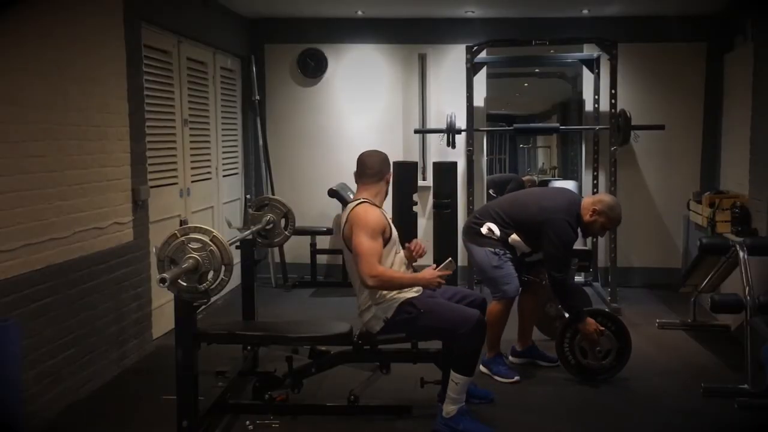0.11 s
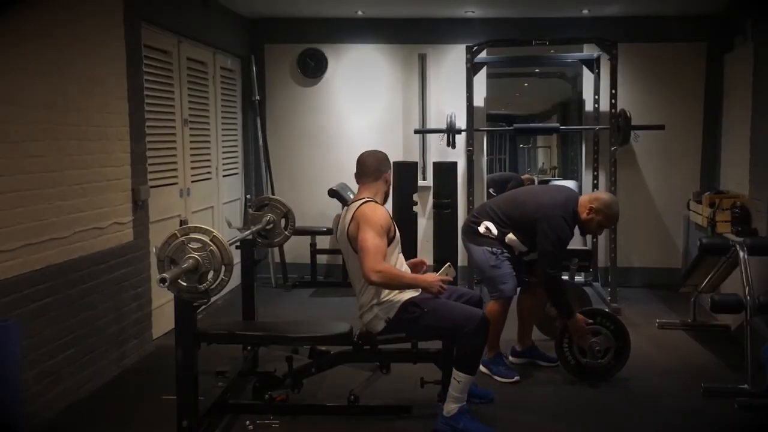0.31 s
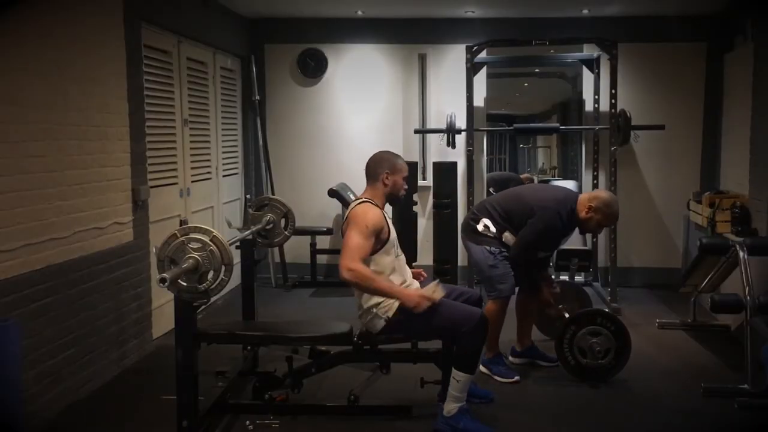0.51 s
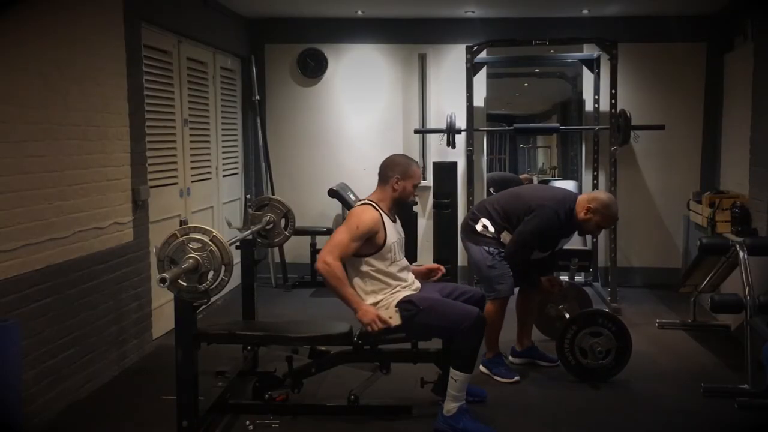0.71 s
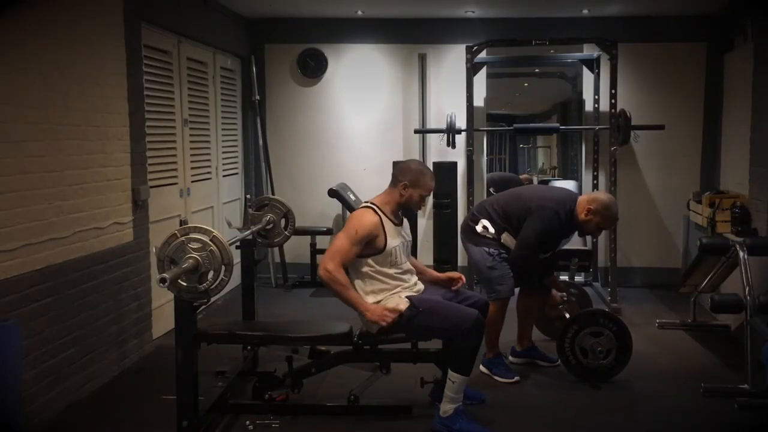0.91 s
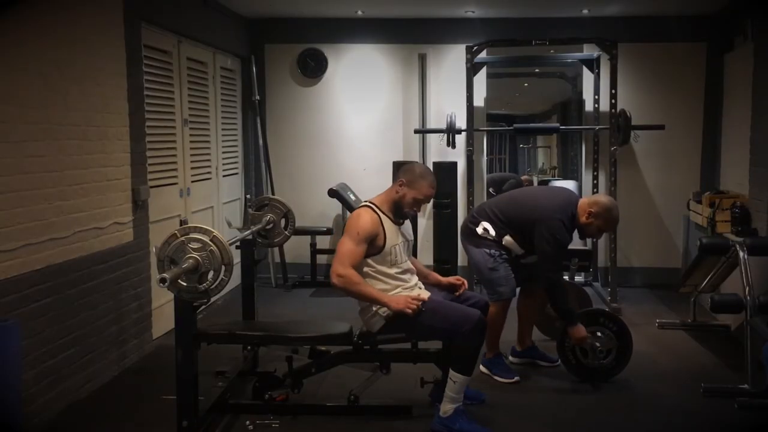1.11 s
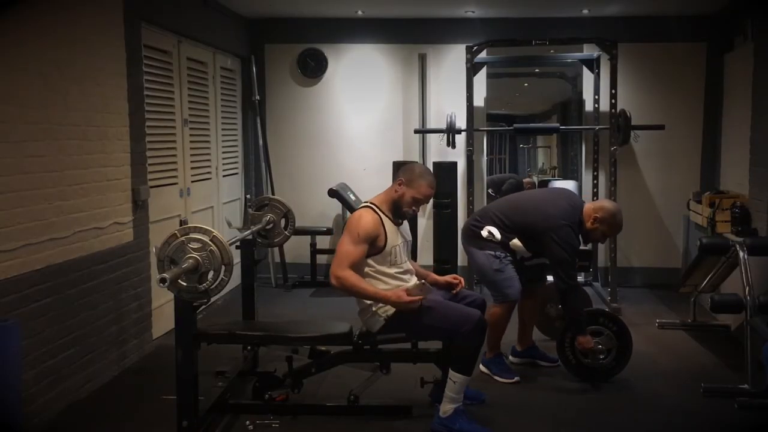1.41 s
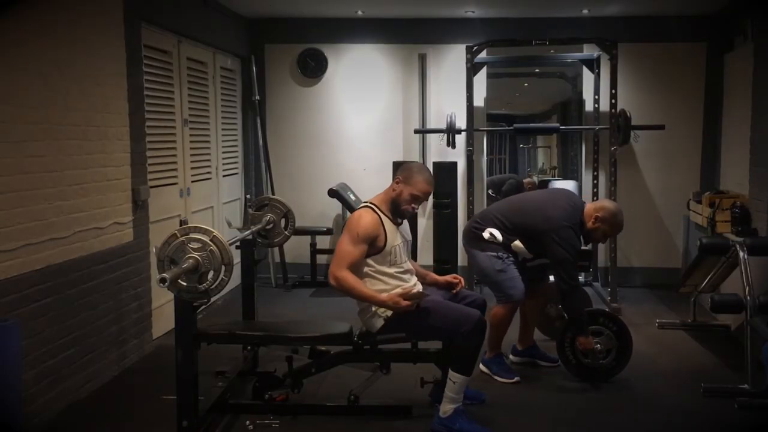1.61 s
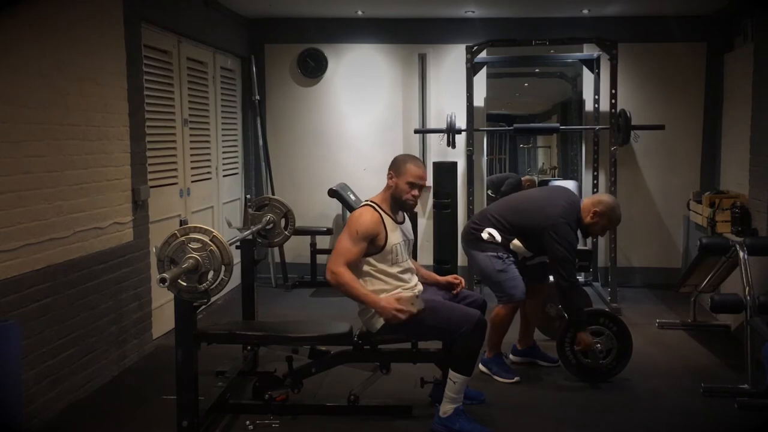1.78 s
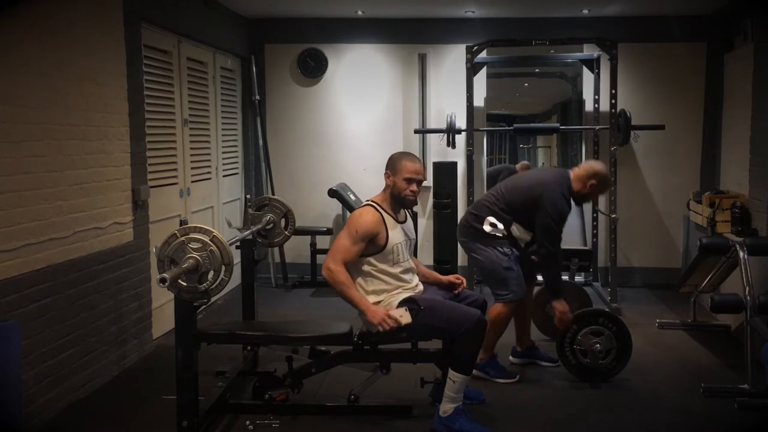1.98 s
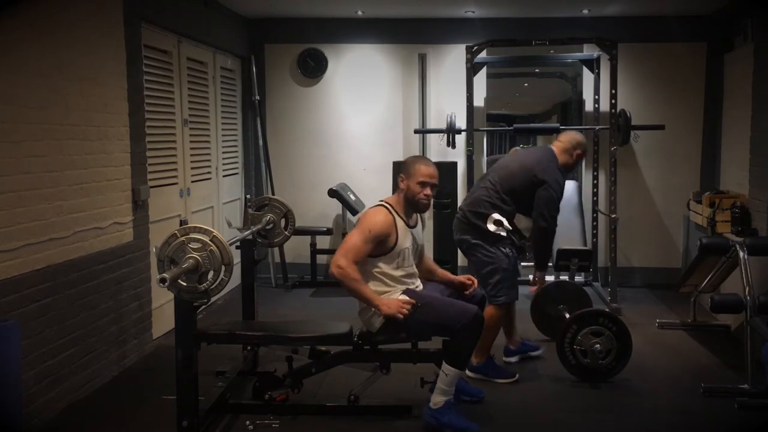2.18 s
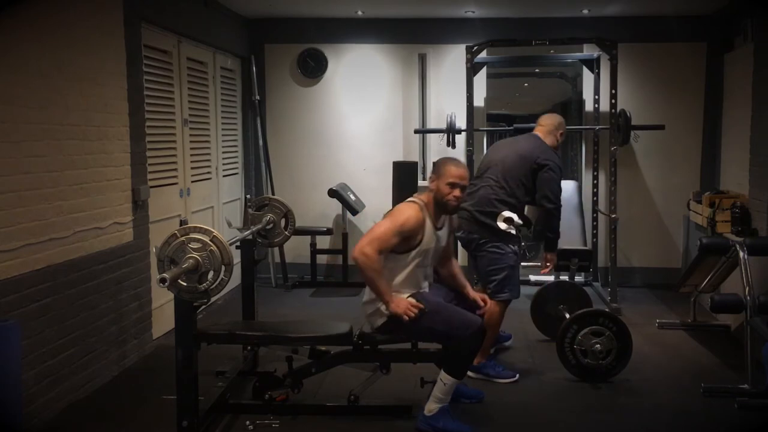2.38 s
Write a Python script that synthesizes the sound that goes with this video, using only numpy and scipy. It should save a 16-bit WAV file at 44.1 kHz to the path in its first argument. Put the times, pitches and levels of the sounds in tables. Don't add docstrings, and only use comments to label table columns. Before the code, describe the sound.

A weight plate clangs in a small, hard-walled gym. An earlier clank fades at the start; gritty iron scrapes at 0.15 s, then a loud, slightly overloaded clang with rapid rebounds hits at 0.23 s. Ringing is damped after 0.75 s. A shoe thuds near 0.9 s, small plates clink lightly from 1.34 to 1.8 s, and shoes scuff and step from 2.2 s, over faint cloth rustle, ventilation and hum.

```python
import sys
import numpy as np
from scipy import signal
from scipy.fft import rfft, irfft, next_fast_len
from scipy.io import wavfile
from scipy.ndimage import uniform_filter1d

SR = 44100
rng = np.random.default_rng(int(sys.argv[2]) if len(sys.argv) > 2 else 0)


def natural_amplitude(level_db):
    exponent = np.asarray(level_db, float) / 20
    return 10 ** exponent


def store_pcm(level_fs):
    pcm = np.round(np.clip(level_fs, -1, 1) * 32767).astype(np.int16)
    wavfile.write(sys.argv[1], SR, np.atleast_2d(pcm).T)


N = 110250
LEAD = 22050


def unit(x):
    return x / np.sqrt(np.mean(x ** 2) + 1e-20)


def along(points, hz):
    f, value = np.transpose(points)
    return np.interp(np.log(hz + 1), np.log(f + 1), value)


def noise(n, response):
    m = next_fast_len(n + 8192)
    spectrum = rfft(rng.standard_normal(m)) * response(np.fft.rfftfreq(m, 1 / SR))
    return unit(irfft(spectrum, m)[:n])


def peak(f, hz, width):
    return 1j * f * width / (hz * hz - f * f + 1j * f * width)


def soft_start(t, rise_s):
    return 1 - np.exp(-t / rise_s)


def add(out, s, x):
    part = out[round(s * SR) + LEAD:][:len(x)]
    part += x[:len(part)]


# frequency in Hz, t60 in seconds.
ROOM_DECAY = [(100, 1.8), (400, .9), (1500, 1.6), (4000, 1.27), (8000, 0.73), (15000, 0.45)]


def heard(x, wet_db):
    early_share, late_db, gap_s = 0.32, -4, 0.004
    hz, t, z = signal.stft(rng.standard_normal(SR * 3 // 2), SR, nperseg=256)
    fall_db = -60 * t / along(ROOM_DECAY, hz)[:, None]
    decay = natural_amplitude(fall_db / early_share) + natural_amplitude(fall_db + late_db)
    tail = signal.istft(z * decay, SR, nperseg=256)[1]
    tail = tail * np.clip(np.arange(len(tail)) / SR / gap_s, 0, 1)
    out = signal.fftconvolve(x, natural_amplitude(wet_db) * tail / np.linalg.norm(tail))
    out[:len(x)] += x
    return out


def blow(modes, ring_db, tilt_db, wet_db, crack_db, colour, bright_db=0, grip=(1, 1)):
    attack_s, crack_t60, wet_crack_db = 0.0004, 0.008, 8.5
    t = np.arange(SR) / SR
    ring = np.zeros(SR)
    for hz, db, t60 in modes:
        level_db = db + tilt_db * np.log2(hz / 1000) - 60 * t / t60
        ring += natural_amplitude(level_db) * np.sin(2 * np.pi * hz * t)
    grip_s, grip_t60 = grip
    damping = natural_amplitude(-60 * np.clip(t - grip_s, 0, 1) / grip_t60)
    out = natural_amplitude(ring_db) * heard(ring * soft_start(t, attack_s) * damping, wet_db)

    t = t[:SR // 20]
    snap = noise(len(t), lambda f: natural_amplitude(along(colour, f) + bright_db * np.log2(f / 4000 + 0.0087)))
    snap = snap * natural_amplitude(crack_db - 60 * t / crack_t60) * soft_start(t, attack_s)
    crack = heard(snap, wet_crack_db)
    out[:len(crack)] += crack
    return out


# frequency in Hz, level in dB.
CRACK_BIG = [(35, -67.5), (90, -35.5), (340, -13), (600, -13), (1200, -18), (4000, -22), (8150, -22.5),
             (16500, -68)]
# frequency in Hz, level in dB, t60 in seconds.
PLATE_MODES = [(351.6, -11.5, 0.1), (780.7, -13, 0.57), (827.7, -0.5, 0.82), (892, -7.5, 0.18),
               (1072, -14, 0.087), (1287, -13.5, 0.43), (1508.5, -5, .2), (1527.5, -14, 0.41),
               (1965, -17, .3), (2460, -31, 0.1), (2837, -9, 0.37), (3483, -17.5, 0.11), (4027, -13, 0.11),
               (5398, -20.5, 0.079)]
# start in seconds, ring level in dB, ring brightness in dB per octave,
# crack level in dB, crack brightness in dB per octave.
CLANGS = [
    (.2325, -10.5, -0.5, -16, -0.5),
    (.2545, -14.5, 2.5, -12, 0),
    (.277, -13.5, -2.5, -26, -1),
    (.312, -20, 8.5, -32, 4.5),
]


def big_plate(out):
    grip_s, grip_t60 = 0.28, 0.04
    for s, ring_db, tilt_db, crack_db, bright_db in CLANGS:
        grip = (grip_s - s, grip_t60)
        add(out, s, blow(PLATE_MODES, ring_db, tilt_db, -6, crack_db, CRACK_BIG, bright_db, grip))


# frequency in Hz, level in dB, t60 in seconds.
STRUCK_MODES = [(820, -6, 1.2), (829, 1.5, 4), (830.3, -2.5, 2.9), (1191, -9, 1.3), (1316, -13, 4.8),
                (1520, -12.5, 1.2), (1565, -14, 1.5), (1966, -24, 1.3), (2830, -19, 1.1),
                (2870, -14.5, 1.3), (2870, 0, 1.1)]
# start in seconds, ring level in dB, crack level in dB.
STRUCK_BLOW = [
    (.2325, -27.5, -63),
]


def struck_plate(out):
    grip_s, grip_t60 = 0.75, 0.21
    for s, ring_db, crack_db in STRUCK_BLOW:
        grip = (grip_s - s, grip_t60)
        add(out, s, blow(STRUCK_MODES, ring_db, 0, -19.5, crack_db, CRACK_BIG, 0, grip))


# frequency in Hz, level in dB.
CRACK_SMALL = [(400, -52), (900, 3), (2300, -13.5), (5000, -6.5), (8300, -10.5), (12000, -10), (15500, -10),
               (16500, -30)]
# frequency in Hz, level in dB, t60 in seconds.
EARLIER_MODES = [(780, -5.5, .04), (1323, -4, 0.036), (1520, -9, 0.2), (2027, -14, .1), (2424, -7.5, 0.06),
                 (3270, -4.5, .012), (3700, -4.5, .012), (4430, -9.5, 0.016), (6560, -0.5, 0.011),
                 (7880, -8.5, .012)]
SMALL_A = [(1200, -8.5, 0.034), (2324, 2, 0.024), (3730, -4, .05), (4410, -3.5, 0.076), (6430, 3, 0.023),
           (6940, 0, .025), (8200, -3.5, .05), (9110, -4, 0.039)]
SMALL_B = [(2225, -22, 0.049), (2887, -6, 0.03), (3658, -4, 0.057), (4230, -8, 0.053), (5840, -4, .05),
           (6450, -5, 0.078), (7760, -8, 0.045), (8350, 6, 0.059), (10000, -1.5, 0.031),
           (10070, -16, 0.035)]
SMALL_C = [(1290, -5.5, 0.26), (1320, -24, 0.11), (3606, -1.5, 0.044), (4460, -10, .03), (6370, 4.5, 0.023),
           (6660, 6.5, 0.042), (8300, 4.5, .05), (9730, -17, .03), (13600, -26, .03)]
SMALL_D = [(3220, -7.5, .05), (3700, -12, 0.022), (5880, 0, 0.011), (6760, -7, 0.013), (8355, -19, .03)]
# start in seconds, ring level in dB, crack level in dB,
# crack brightness in dB per octave.
EARLIER_BLOW = [
    (-0.27, -30, -17, -2),
]
CLINKS_A = [
    (1.339, -40.5, -30.5, 1.5),
    (1.357, -46.5, -39, -2.5),
]
CLINKS_B = [
    (1.4833, -39, -29, 1),
    (1.607, -52, -35, -2),
]
CLINKS_C = [
    (1.660, -47.5, -31.5, -4),
    (1.678, -51, -41.5, 1.5),
]
CLINKS_D = [
    (1.800, -43.5, -43, -2),
]


def small_plates(out):
    held_hz, held_t60 = 3000, 0.035
    pairs = ((EARLIER_MODES, EARLIER_BLOW), (SMALL_A, CLINKS_A), (SMALL_B, CLINKS_B),
             (SMALL_C, CLINKS_C), (SMALL_D, CLINKS_D))
    for modes, contacts in pairs:
        held = [(hz, db, min(t60, held_t60) if hz > held_hz else t60) for hz, db, t60 in modes]
        for s, ring_db, crack_db, bright_db in contacts:
            add(out, s, blow(held, ring_db, 0, 7.5, crack_db, CRACK_SMALL, bright_db))


def plates():
    out = np.zeros(N + LEAD)
    big_plate(out)
    struck_plate(out)
    small_plates(out)
    bass_cut = signal.butter(2, 170, 'high', fs=SR, output='sos')
    return signal.sosfilt(bass_cut, out)[LEAD:]


# time in seconds, level in dB.
SLIDE_LEVEL = [
    (.152, -83),
    (0.159, -48),
    (.18, -41.5),
    (.193, -37),
    (.205, -38.5),
    (.215, -32.5),
    (.232, -33.5),
    (.24, -91.5),
]
# frequency in Hz, width in Hz, level in dB.
GRIT_MODES = [(696, 89, 1.5), (1532, 170, 1), (1983, 9.2, 4), (3770, 300, -3.5), (4280, 400, -14),
              (6760, 400, -14), (7860, 300, -26.5), (9200, 210, -25.5)]
# frequency in Hz, level in dB.
GRIT_HISS = [(180, -55), (300, -10), (1510, 0), (2400, -29.5), (3460, -4), (7950, -19.5), (16000, -48)]


def slide():
    broad_db, grain_db = -10, 2

    def colour(f):
        ringing = sum(natural_amplitude(db) * peak(f, hz, width) for hz, width, db in GRIT_MODES)
        return ringing + natural_amplitude(broad_db + along(GRIT_HISS, f))

    grit = noise(N, colour)
    grain = unit(uniform_filter1d(rng.standard_normal(N), size=90))
    grit = unit(grit * natural_amplitude(grain_db * grain))
    s, db = np.transpose(SLIDE_LEVEL)
    level_db = np.interp(np.arange(N) / SR, s, db, left=-120, right=-120)
    return heard(grit * natural_amplitude(level_db), -6)[:N]


# start in seconds, level in dB, frequency in Hz, t60 in seconds.
STEPS = [
    (.855, -38.5, 268, 0.053),
    (.915, -44.5, 300, .12),
    (2.19, -53, 810, .12),
    (2.233, -49, 410, .05),
    (2.277, -44.5, 790, 0.019),
    (2.386, -41, 275, 0.093),
    (2.427, -40, 288, 0.038),
    (2.463, -43, 247, 0.059),
]


def steps():
    out = np.zeros(N + LEAD)
    t = np.arange(SR // 5) / SR
    for s, db, hz, t60 in STEPS:
        thud = noise(len(t), lambda f: peak(f, hz, 0.42 * hz) ** 2)
        thud = thud * natural_amplitude(db - 60 * t / t60) * soft_start(t, 0.002)
        add(out, s, heard(thud, -4))
    return out[LEAD:]


# centre in seconds, length in seconds, level in dB.
RUSTLES = [
    (0.745, 0.19, -59),
    (1.063, .25, -68),
    (2.222, 0.19, -62),
]
# frequency in Hz, level in dB.
CLOTH_COLOUR = [(300, -45), (800, -1.5), (2000, -12.5), (6000, -20.5), (14000, -34.5), (16500, -57)]


def cloth():
    t = np.arange(N) / SR
    swell = sum(natural_amplitude(db) * np.exp(-(2 * (t - s) / length) ** 2) for s, length, db in RUSTLES)
    grain = natural_amplitude(1.75 * unit(uniform_filter1d(rng.standard_normal(N), size=200)))
    return swell * unit(grain * noise(N, lambda f: natural_amplitude(along(CLOTH_COLOUR, f))))


# frequency in Hz, level in dB.
AIR_COLOUR = [(20, -32), (48, -7), (150, -9.5), (500, -8), (1300, -17), (4000, -32), (9000, -40),
              (16500, -55.5)]


def room_air():
    air_db, patchy_db = -57.5, 0.8
    hum_hz, hum_width_hz, hum_db = 138.2, 18, -63.5
    z = signal.stft(noise(N + 512, lambda f: natural_amplitude(along(AIR_COLOUR, f))), nperseg=512)[2]
    patches = uniform_filter1d(rng.standard_normal(z.shape), 6, 0)
    patches = uniform_filter1d(patches, 14, 1)
    air = unit(signal.istft(z * natural_amplitude(patchy_db * unit(patches)), nperseg=512)[1][:N])
    hum = noise(N, lambda f: peak(f, hum_hz, hum_width_hz) ** 2)
    return natural_amplitude(air_db) * air + natural_amplitude(hum_db) * hum


def scene():
    return (plates() + slide() + steps() + cloth() + room_air())[None]


def top_cut(x):
    return signal.sosfilt(signal.butter(12, 17010, fs=SR, output="sos"), x)


def record(dry):
    ceiling, knee, top_hz = 0.497, 10, 16600
    x = dry / (1 + np.abs(dry / ceiling) ** knee) ** (1 / knee)
    mix = irfft(rfft(x) * (np.fft.rfftfreq(N, 1 / SR) < top_hz), N)
    return top_cut(mix)


dry = scene()
out = record(dry)
store_pcm(out)
```